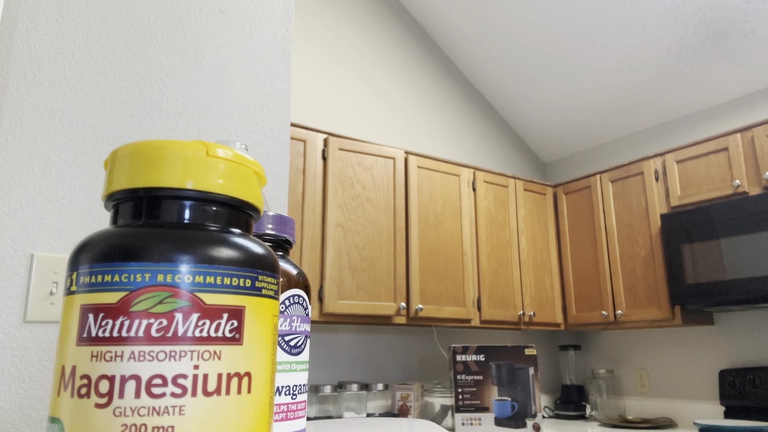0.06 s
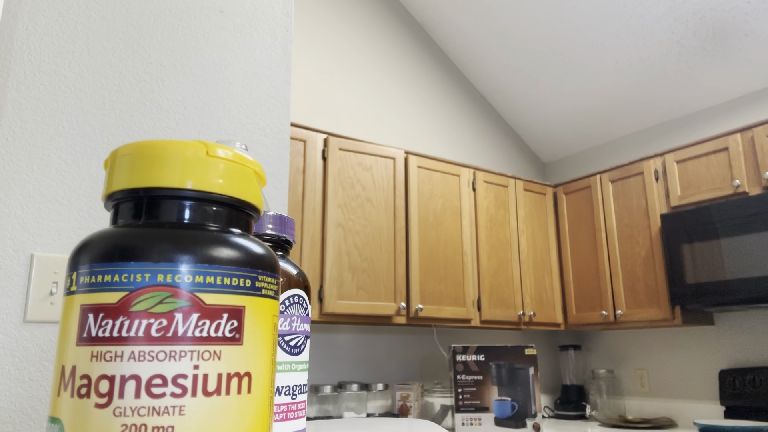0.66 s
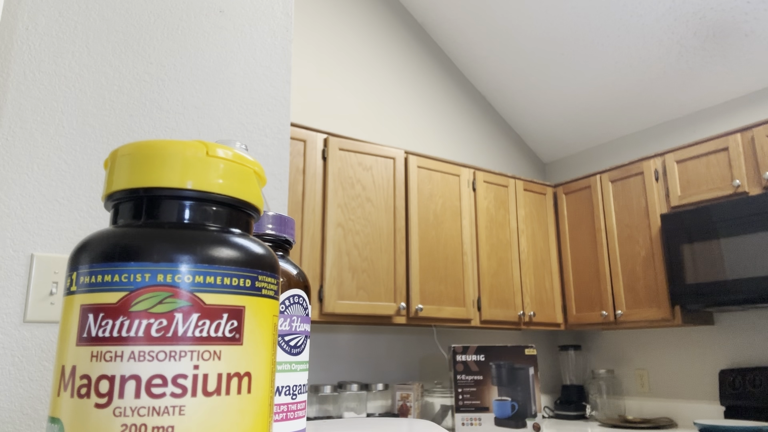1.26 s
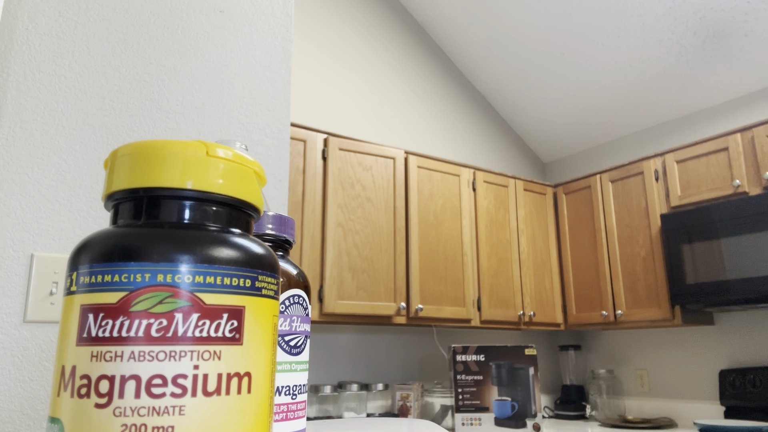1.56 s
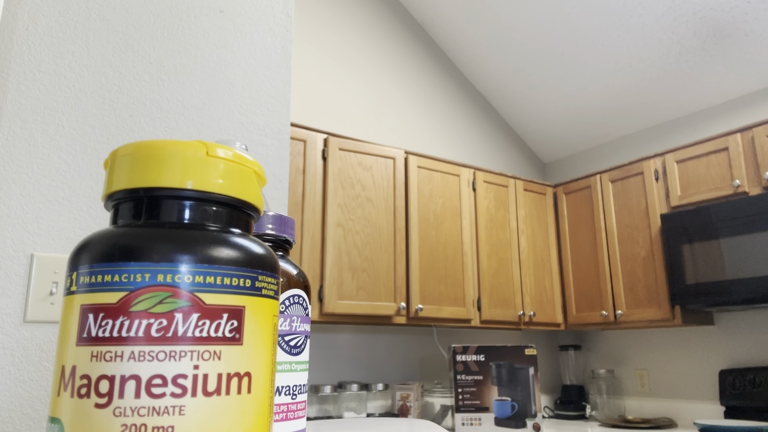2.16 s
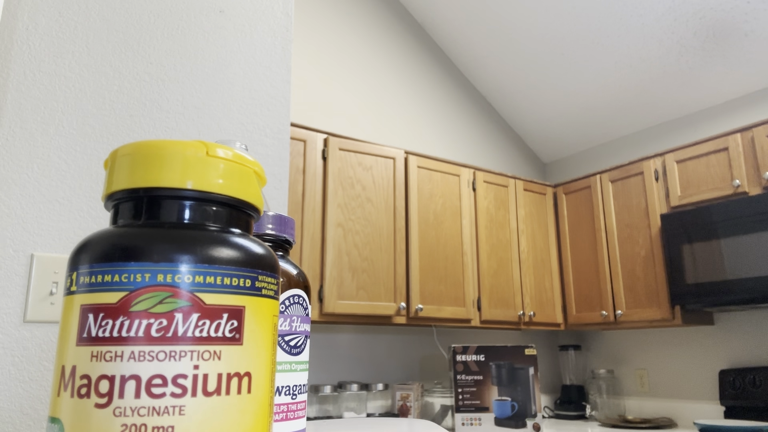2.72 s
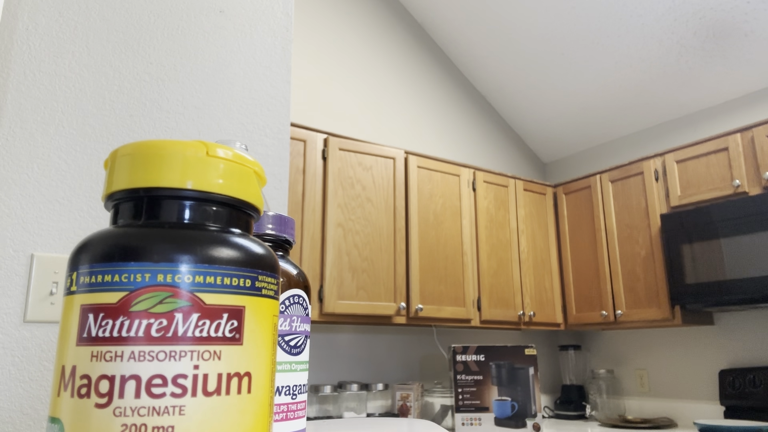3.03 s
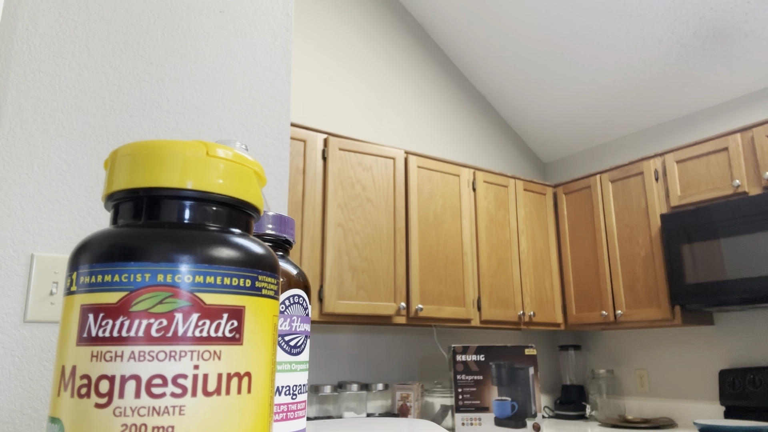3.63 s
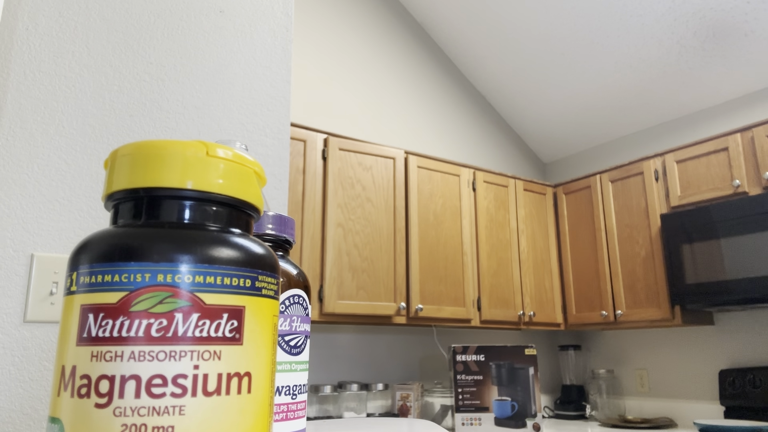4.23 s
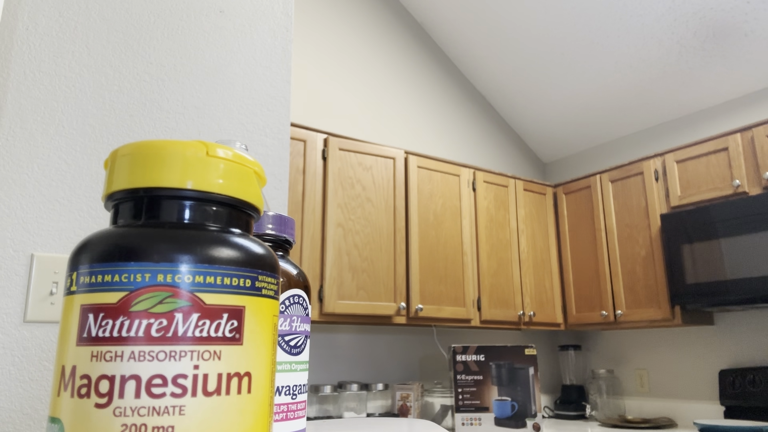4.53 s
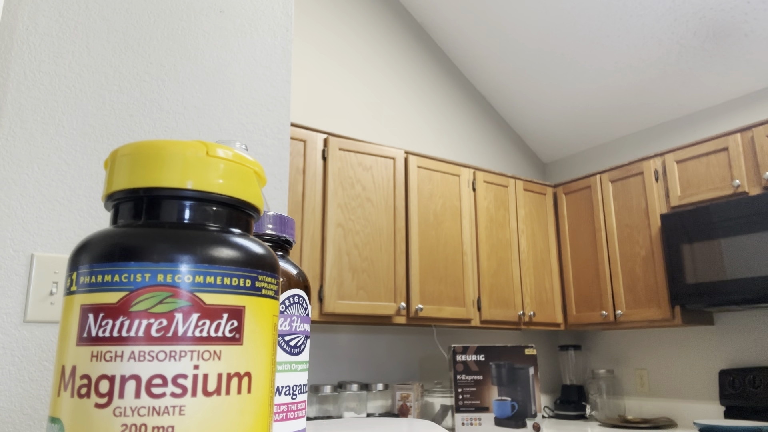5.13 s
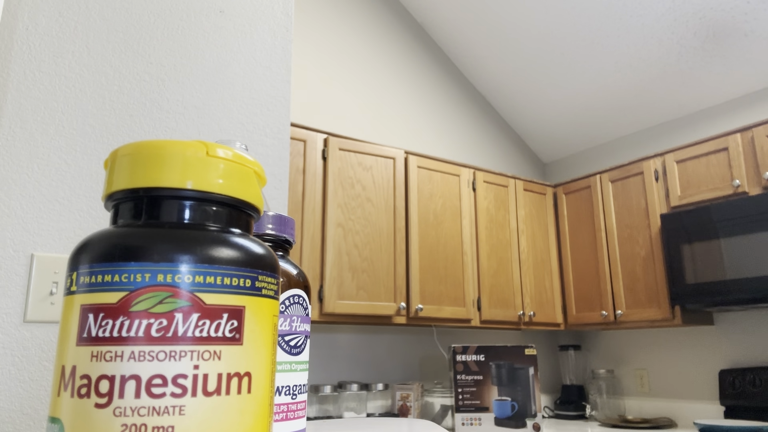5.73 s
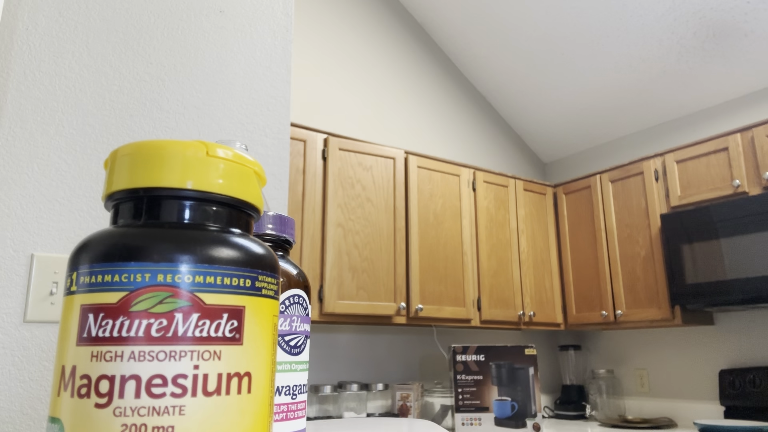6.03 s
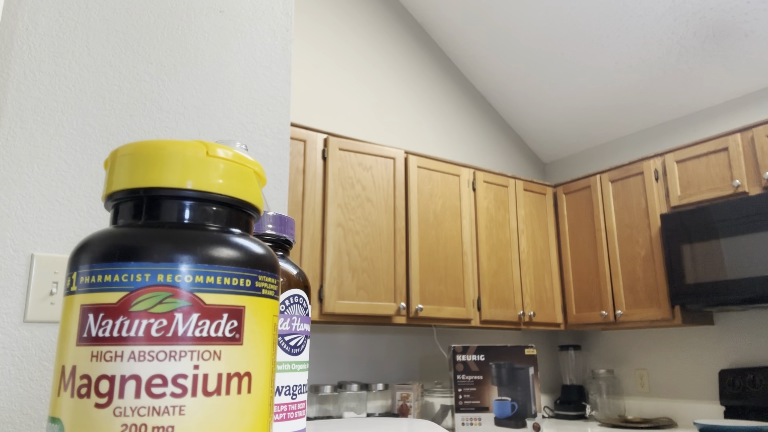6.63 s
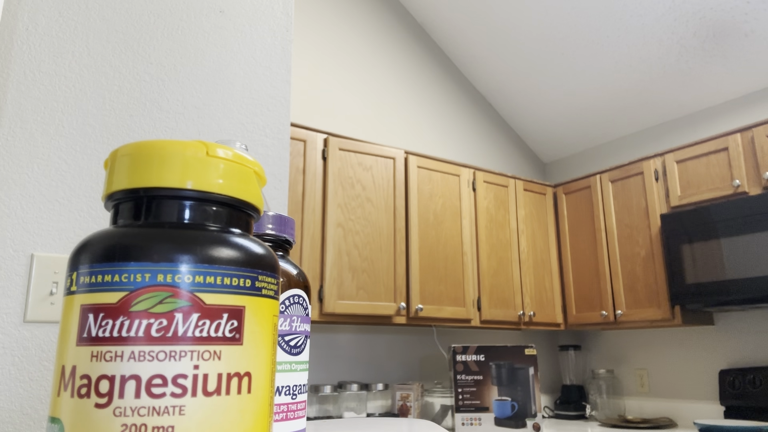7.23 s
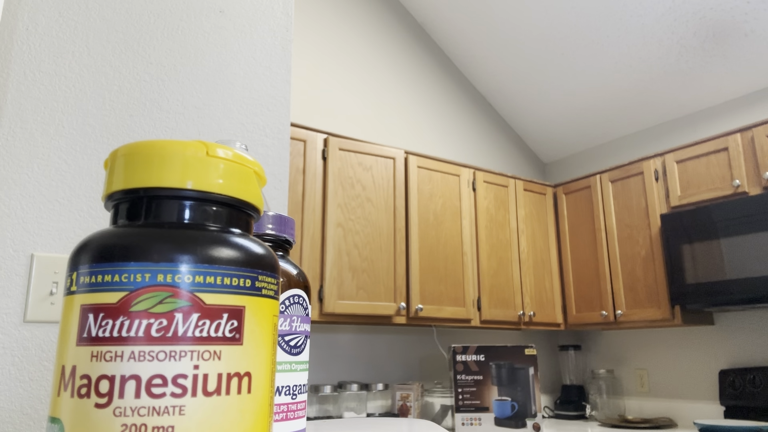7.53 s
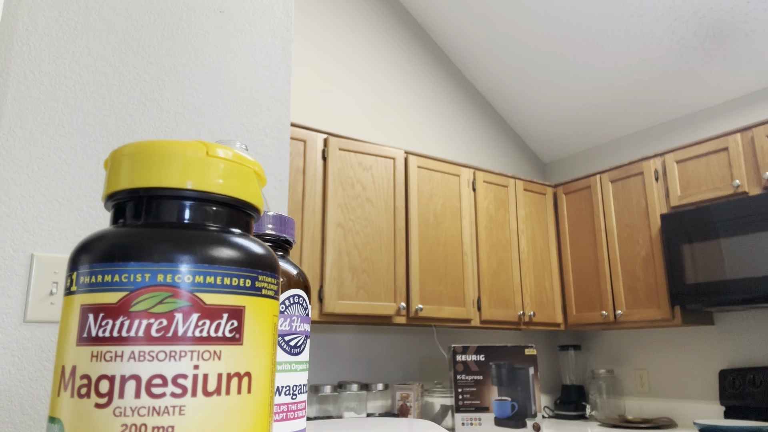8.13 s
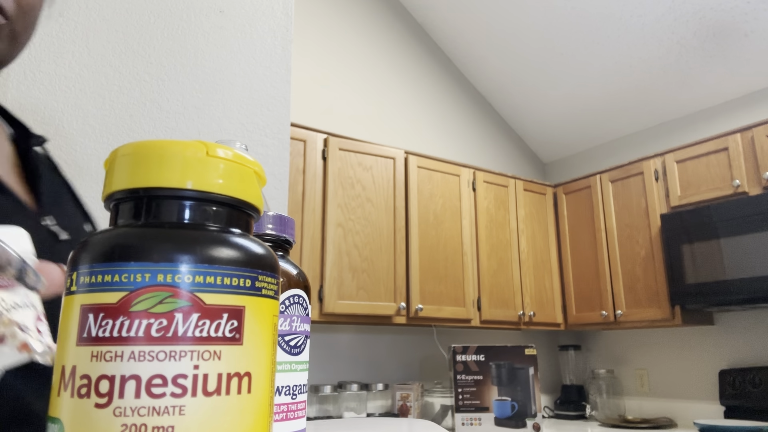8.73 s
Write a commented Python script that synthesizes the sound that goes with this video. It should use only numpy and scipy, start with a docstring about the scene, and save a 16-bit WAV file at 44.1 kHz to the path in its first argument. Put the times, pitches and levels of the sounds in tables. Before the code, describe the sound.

Close handling of plastic bottles: hollow knocks, ticking lids, a shower of pills and one heavy thud over a faint kitchen hum.

```python
"""Plastic supplement bottles are handled on a kitchen counter, close to a two-port microphone.
A faint appliance hum runs throughout. Sleeves swish and bottles slide; from 1 s lids tick, bottles
land rim first and knock hollowly as they settle, a few pills tumble and a fingertip skids.
Louder knocks follow near 4 s, then short rasps and, just after 5 s, a bright shower of pills.
At 7 s something heavy lands with a thud, and soft shuffling closes. The hard-walled kitchen rings on."""
import sys
import numpy as np
from scipy import signal
from scipy.fft import rfft, irfft, next_fast_len
from scipy.io import wavfile

SR = 44100
rng = np.random.default_rng(int(sys.argv[2]) if len(sys.argv) > 2 else 0)


def persist_wave(psi):
    """Save psi, clipped to +-1, as 16-bit WAV."""
    counts = np.round(np.clip(psi, -1, 1) * 32767).astype(np.int16)
    wavfile.write(sys.argv[1], SR, np.atleast_2d(counts).T)


N = 395577

# the kitchen's reverb tail: (frequency [Hz], t60 [s])
KITCHEN_DECAY = [(250, 0.82), (2000, 0.78), (6000, 0.78), (13000, 0.5)]
# appliance hum: (frequency [Hz], level [dB])
HUM_TONES = [(120, -57.5), (264, -70), (319, -69)]
# room tone: (frequency [Hz], level [dB])
RUSH_SPECTRUM = [(25, -27), (100, -12.5), (160, -24.5), (470, -24), (800, -31.5), (1500, -49), (4000, -56),
                 (11000, -61.5), (15500, -72)]

# bottles slid over the counter: (start [s], length [s], level [dB])
SLIDES = [(0.003, 0.4, -65), (1.342, 0.61, -51.5), (1.962, 0.49, -55), (4.672, 0.086, -36),
          (5.895, 0.17, -44), (6.27, 0.3, -53), (6.637, 0.32, -52), (6.97, 0.14, -40), (7.595, 0.43, -55),
          (8, 0.71, -55.5), (8.576, 0.65, -52.5)]
# the sleeve alone as the arm reaches: (start [s], length [s], level [dB])
REACHES = [(4.68, 1, -56), (5.995, 0.074, -49.5), (6.665, 0.23, -53.5), (8.03, 0.61, -66.5), (8.70, 1, -63)]
# plastic dragging on the counter: (frequency [Hz], level [dB])
SCRAPE_SPECTRUM = [(88, -39), (150, -8), (367, -8), (1010, -6), (5000, -33), (11000, -88.5)]
# sleeve cloth: (frequency [Hz], level [dB])
SWISH_SPECTRUM = [(1470, -19), (2500, -10.5), (4600, -10), (11800, -20.5), (15500, -38)]

# fingers and lids tapping a bottle: (time [s], level [dB], relative snap [dB], relative body [dB])
TAPS = [(1.026, -42, -9.5, 1.5), (1.350, -42.5, -9, 8), (1.425, -43, -5.5, -19), (1.639, -34, -15, -13),
        (1.921, -41.5, -9.5, 12), (2.441, -44.5, -28, 0), (2.482, -41, -18.5, 3), (2.597, -48, -33, 6),
        (2.665, -30.5, -12, -4.5), (3.035, -35.5, -15, 6.5), (3.294, -44.5, -11, -14),
        (3.443, -35.5, -10, -1.5), (3.548, -27, -19, -1.5), (4.521, -42, -5.5, 2.5),
        (4.666, -28.5, -13, 7.5), (4.97, -29.5, -38.5, -4.5), (5.114, -25, -37, -2.5),
        (5.166, -22.5, -3.5, -13), (5.275, -14.5, -5.5, 4.5), (5.457, -18.5, -10.5, -12),
        (5.745, -40, -4, -21), (6.289, -51.5, 3.5, -18), (7.029, -22.5, -26, -9), (7.077, -17.5, -8.5, -31),
        (7.401, -44.5, -1.5, -2), (7.490, -47, -1.5, 5), (7.757, -54, 4, -17), (7.796, -48, -35, -6),
        (7.887, -53.5, 2.5, -11)]
# the bright edge of a contact: (frequency [Hz], level [dB])
SNAP_SPECTRUM = [(1000, -50.5), (3000, -2.5), (5000, 1.5), (8000, -0.5), (12000, -8.5), (15000, -25.5)]
# a lid flexing: (frequency [Hz], level [dB])
CLACK_SPECTRUM = [(150, 3), (350, -2.5), (1150, 6.5), (2300, 0), (2800, -3.5), (3600, -8), (9000, -28.5)]
# a lid ringing: (frequency [Hz], level [dB], t60 [s])
LID_MODES = [(2091, -7, 0.049), (2345, 4, 0.012)]

# bottles set down: (time [s], rim level [dB], base level [dB], base pitch [Hz], springiness [0-1])
LANDINGS = [(1.072, -20, -20.5, 735, 0.87), (1.362, -42, -35, 694, 0.15), (1.505, -26, -24, 625, 0.37),
            (1.641, -35, -29, 625, 0.32), (3.838, -24.5, -17.5, 650, .4), (3.888, -22, -6, 620, 0.28),
            (3.920, -29, -6, 572, .2), (4.188, -28, -25, 490, .3), (4.428, -44, -31.5, 635, 0.28),
            (5.165, -13, -2, 478, .45), (5.392, -20.5, -10, 720, 0.4), (5.893, -32.5, -26, 503, 0.07),
            (6.290, -37, -30, 440, 0.3), (7.797, -38, -31, 425, 0.57)]
# a held bottle nudges its neighbours: (time [s], level [dB])
BUMPS = [(2.05, -33), (2.2, -40), (3.335, -42.5), (8.631, -34)]
# a hollow bottle ringing on the counter: (frequency [Hz], level [dB], t60 [s])
BOTTLE_MODES = [(310.1, -15, 0.3), (350.2, -2.5, 0.08), (429.7, -11, 0.082), (508, -2.5, 0.036),
                (584, 1.5, 0.057), (642.4, -2, 0.095), (706.5, -9.5, 0.17)]

# pills sliding and piling up: (time [s], level [dB], settling t60 [s])
TUMBLES = [(1.087, -39.5, 0.67), (5.161, -31.5, 1.15), (5.255, -19.5, 0.13), (5.272, -13, 0.1224),
           (5.303, -18.5, 0.04), (5.379, -16.5, 0.2338), (5.458, -20, 0.2662), (7.074, -26.5, 0.76)]
# their rattle: (frequency [Hz], level [dB])
PILL_SPECTRUM = [(120, -58), (200, -16.5), (345, -2), (554, -3), (680, 1.5), (2060, -13.5), (11400, -37.5),
                 (15500, -50.5)]
# the pill bottle's wall: (frequency [Hz], width [Hz], level [dB])
WALL_RESONANCES = [(4680, 290, 0), (8000, 940, -3.5), (11000, 1200, -10)]

# a fingertip on plastic: (start [s], length [s], pitch [Hz], width [Hz], level [dB])
SKIDS = [(1.235, 0.063, 5200, 130, -59), (8.636, 0.055, 10800, 2580, -60)]

# heavy blows and soft bumps through the counter: (time [s], level [dB], relative slap [dB])
THUDS = [(4.207, -45.5, 9), (5.19, -35.5, 8.5), (5.755, -28.5, -18.5), (6.992, -25.5, -10.5),
         (7.08, -24.5, -0.5), (7.090, -5.5, -12.5), (7.103, -9.5, -9.5), (7.168, -19, -11.5),
         (8.643, -31.5, -18.5)]
# the counter's boom: (frequency [Hz], level [dB], t60 [s])
COUNTER_MODES = [(55, -1, 0.17), (75.4, 4.5, 0.16), (153.5, -8, 0.25), (194, -10.5, 0.13),
                 (234.6, -9.5, 0.25), (331, -7.5, 0.21)]
# a blow's dull slap: (frequency [Hz], level [dB])
SLAP_SPECTRUM = [(59, -46.5), (120, -4.5), (595, -0.5), (1130, -12.5), (2300, -21.5), (15600, -75)]

# fingers and pills scraping the wall: (start [s], length [s], level [dB], tilt [dB/octave])
RASPS = [(4.688, 0.12, -56, 1), (4.794, 0.07, -50, 2), (4.876, 0.065, -55.5, 4.5), (4.971, 0.06, -52, -2.5),
         (5.167, 0.093, -35, -8), (6.68, 0.17, -55, -1), (7.713, 0.22, -63.5, -1.5)]

PORT_GAP_S, DIFFUSE_GAP_S = 0.0004985, 0.00092  # port spacing: for direct sound, for sound from all sides
TOP_HZ = 15600
RIM_HZ, RIM_TICK_DB, RIM_SNAP_DB = 385, -12, -10  # a rim's low knock; its tick; the snap in that tick
TIP_S, FLIGHT_S, BOUNCE_LOSS_DB = .014, .046, 1.0  # rim to base; a fully springy hop; growing hop loss
JOLTS_PER_S, JOLT_DB, JOLT_HZ = 7, 8, 402  # a sliding bottle catches and knocks; dB over the slide
DEEPEST_HZ, DB_PER_OCTAVE = 33.7, 25  # low cutoff of a 0 dB blow; this much softer lifts it an octave


def amp(db):
    """Decibels to gain."""
    return 10 ** (np.asarray(db) / 20)


def unit(x):
    """Scaled to rms 1."""
    return x / np.sqrt(np.mean(x ** 2) + 1e-20)


def along(points, hz):
    """A curve of (frequency [Hz], value) points, read on a log axis."""
    freqs, values = np.transpose(points)
    return np.interp(np.log(hz + 1), np.log(freqs + 1), values)


def filtered(x, response):
    """x through an EQ given as a function of frequency."""
    n = x.shape[-1]
    padded = next_fast_len(n + SR // 5)
    return irfft(rfft(x, padded) * response(np.fft.rfftfreq(padded, 1 / SR)), padded)[..., :n]


def coloured(x, spectrum):
    """x shaped by a spectrum, at rms 1."""
    return unit(filtered(x, lambda hz: amp(along(spectrum, hz))))


def add(track, s, sound):
    """Mix a sound in at s seconds."""
    part = track[round(s * SR):][:len(sound)]
    part += sound[:len(part)]


def fade(t, t60):
    """An exponential decay, 60 dB down at t60."""
    return np.exp(-np.log(1000) * t / t60)


def swell(length, skew):
    """A stroke swells gently and eases off; a skew below 1 brings the peak forward."""
    return np.sin(np.pi * np.linspace(0, 1, round(length * SR)) ** skew) ** 2


def effort(strokes, skew):
    """The envelope of a series of strokes."""
    out = np.zeros(N)
    for s, length, db in strokes:
        add(out, s, amp(db) * swell(length, skew))
    return out


def ring(modes, t, scatter_db, weight=1):
    """Damped modes, struck together at new strengths, with a joint amplitude of 1."""
    hz, db, t60 = np.transpose(modes)
    size = weight * amp(db + scatter_db * rng.standard_normal(len(hz)))
    partials = fade(t, t60[:, None]) * np.sin(2 * np.pi * hz[:, None] * t)
    return size / np.linalg.norm(size) @ partials


def grains(n, per_s, spread_db):
    """Tiny contacts at random moments and of random size, rms 1."""
    hit = rng.random(n) < per_s / SR
    return unit(hit * rng.choice([-1, 1], n) * amp(spread_db * np.clip(rng.standard_normal(n), -2, 2)))


def direct(x, left_db=2.0):
    """Sound from the left reaches the left port first."""
    pair = filtered(x, lambda hz: np.exp(1j * np.pi * hz * PORT_GAP_S * np.array([[1], [-1]])))
    return pair * amp([[left_db], [-left_db]])


def diffuse(pair):
    """Sound from all sides: the two ports agree only at long wavelengths."""
    turn = lambda hz: np.arccos(np.sinc(2 * hz * DIFFUSE_GAP_S)) / 2
    mid, side = filtered(pair, lambda hz: np.array([np.cos(turn(hz)), np.sin(turn(hz))]))
    return np.array([mid + side, mid - side])


def reflections(x, early_db, tail_db, early_t60=0.23):
    """Early reflections off nearby things, then the room's tail."""
    t = np.arange(SR) / SR
    hz, frames, noise = signal.stft(rng.standard_normal((2, SR)), SR, nperseg=256)
    decaying = noise * fade(frames, along(KITCHEN_DECAY, hz)[:, None])
    tail = signal.istft(decaying, SR, nperseg=256)[1][:, :SR]
    tail *= 1 - np.exp(-(t / 0.014) ** 2)
    early = rng.standard_normal((2, SR)) * fade(t, early_t60) * (1 - np.exp(-t / 0.00051))
    room = diffuse(amp(early_db) * unit(early) + amp(tail_db) * unit(tail)) / np.sqrt(SR)
    return signal.fftconvolve(x[None], room, axes=1)[:, :N]


def in_kitchen(x, early_db, tail_db, left_db=0.86):
    """A source heard directly and through the room."""
    return direct(x, left_db) + reflections(x, early_db, tail_db)


def appliance(rush_db=-59):
    """The bed: mains hum over the low rush of a running appliance."""
    t = np.arange(N) / SR
    hum = sum(amp(db) * np.sqrt(2) * np.sin(2 * np.pi * (hz * t + rng.random())) for hz, db in HUM_TONES)
    rush = amp(rush_db) * coloured(diffuse(rng.standard_normal((2, N))), RUSH_SPECTRUM)
    return (hum + rush) * amp([[-1.2], [1.2]])


def rubbing(scrape_db=-3, swish_db=-5.0, sleeve_db=-19):
    """Bottles scrape in small slips; the sleeve swishes in finer grains with each slide and reach."""
    press = effort(SLIDES, skew=0.41)
    brush = amp(sleeve_db) * press + effort(REACHES, skew=0.33)
    catching = unit(filtered(rng.standard_normal(N), lambda hz: hz < 35))  # skin catches and lets go
    scrape = coloured(grains(N, per_s=300, spread_db=4.5), SCRAPE_SPECTRUM) * press
    swish = coloured(grains(N, per_s=2500, spread_db=7), SWISH_SPECTRUM) * brush
    rub = (amp(scrape_db) * scrape + amp(swish_db) * swish) * amp(1.32 * catching)
    return in_kitchen(rub, early_db=-1.5, tail_db=1.0)


def sharp_contacts():
    """Every tap and landing rim ticks: (time [s], level [dB], snap [dB])."""
    rims = [(s, rim_db + RIM_TICK_DB, RIM_SNAP_DB) for s, rim_db, *_ in LANDINGS]
    return [tap[:3] for tap in TAPS] + rims


def lid_ticks(clack_db=18, snap_db=19, ring_db=3, burst_t60=0.06, uneven_db=4, spots=4):
    """A snap of contact, then the clack and brief ring of a lid; each grip colours it anew."""
    bursts, clicks, t = np.zeros(N), np.zeros((spots, N)), np.arange(SR // 8) / SR
    click = signal.unit_impulse(len(t), SR // 500)
    bands_hz = np.arange(0, TOP_HZ, 220)
    attack = 1 - np.exp(-t / .0015)
    for i, (s, db, bright_db) in enumerate(sharp_contacts()):
        grip_db = uneven_db * np.clip(rng.standard_normal(len(bands_hz)), -1.5, 1.5)
        flex = 1 / (1 + amp(2 * bright_db + 10))  # sharper taps ring less
        clack = lambda hz: flex * amp(along(CLACK_SPECTRUM, hz) + clack_db)
        snap = lambda hz: amp(along(SNAP_SPECTRUM, hz) + bright_db + snap_db)
        colour = lambda hz: amp(np.interp(hz, bands_hz, grip_db)) * (clack(hz) + snap(hz))
        tuning = np.exp(.03 * rng.standard_normal())
        lid = flex * amp(ring_db) * attack * ring(LID_MODES, t * tuning, scatter_db=3)
        burst = rng.standard_normal(len(t)) * fade(t, burst_t60) * attack
        # the ports hear a ragged burst; the room, fed from all sides of the bottle, a clean click
        add(bursts, s, amp(db) * (filtered(burst / np.linalg.norm(burst), colour) + lid))
        add(clicks[i % spots], s, amp(db) * (filtered(click, colour) + lid / 2))
    return direct(bursts) + sum(reflections(spot, early_db=2, tail_db=1.5) for spot in clicks)


def light_contacts(body_lag_s=0.00296):
    """Bumps, taps and random sliding jolts stir the hollow body: (time [s], level [dB], pitch [Hz])."""
    for s, db in BUMPS:
        yield s, db, JOLT_HZ
    for s, db, _, body_db in TAPS:
        yield s + body_lag_s, db + body_db, RIM_HZ * 2 ** (0.34 * rng.random())
    for s, length, db in SLIDES:
        for when, pitch in rng.random((round(JOLTS_PER_S * length), 2)):
            yield s + when * length, db + JOLT_DB, JOLT_HZ * 2 ** (pitch - .5)


def landing_contacts(base_hits=3):
    """Rim first, then the base, in ever shorter, weaker hops: (time [s], level [dB], pitch [Hz])."""
    for s, rim_db, base_db, hz, spring in LANDINGS:
        yield s, rim_db, RIM_HZ
        s += TIP_S
        for hop in range(base_hits):
            yield s, base_db + 20 * np.log10(spring ** hop) - BOUNCE_LOSS_DB * hop ** 2, hz
            s += FLIGHT_S * spring ** (hop + 1)


def bottle_knocks(width_octaves=0.32, gain_db=5, detune=0.029, scuff_db=-19, rise_s=.0016):
    """Each contact rings the hollow modes near its pitch, shifted by the grip, and scuffs the counter."""
    out, t = np.zeros(N), np.arange(SR // 4) / SR
    drag = fade(t, t60=0.07) * (1 - np.exp(-t / .01))
    attack = 1 - np.exp(-(t / rise_s) ** 2)  # the soft base takes a moment to load
    for s, db, pitch_hz in [*landing_contacts(), *light_contacts()]:
        octaves_off = np.log2(np.array(BOTTLE_MODES)[:, 0] / pitch_hz)
        near = 1 / (1 + (octaves_off / width_octaves) ** 2)
        tuning = np.exp(detune * rng.standard_normal())
        body = ring(BOTTLE_MODES, t * tuning, scatter_db=3, weight=near)
        scuff = coloured(rng.standard_normal(len(t)), SCRAPE_SPECTRUM) * drag
        add(out, s, amp(db + gain_db) * (body + amp(scuff_db) * scuff) * attack)
    out = filtered(out, lambda hz: (1j * hz / (200 + 1j * hz)) ** 2)  # small bottles radiate little bass
    return in_kitchen(out, early_db=-9, tail_db=-7)


def wall(hz):
    """The resonances of the pill bottle's thin wall."""
    return sum(amp(db) * 1j * hz * width / (centre ** 2 - hz ** 2 + 1j * hz * width)
               for centre, width, db in WALL_RESONANCES)


def pill_tumbles(ring_db=-1):
    """Showers of pills strike the bottle wall and die away as the pile settles."""
    t = np.arange(N) / SR
    power = sum(amp(2 * db) * (t > s) * fade(np.abs(t - s), settle / 2) for s, db, settle in TUMBLES)
    hits = grains(N, per_s=420, spread_db=4) * np.sqrt(power)
    ringing = filtered(hits, lambda hz: 1 + amp(ring_db) * wall(hz))
    rattle = coloured(ringing, PILL_SPECTRUM) * np.sqrt(power.mean())
    return in_kitchen(rattle, early_db=1.5, tail_db=-3.5)


def finger_skids():
    """Skin sticks and slips on plastic, in a thin unsteady whistle or a quick bright zip."""
    out = np.zeros(N)
    for s, length, pitch_hz, width_hz, db in SKIDS:
        band = lambda hz: np.exp(-((hz - pitch_hz) / width_hz) ** 2)
        out += unit(filtered(rng.standard_normal(N), band)) * effort([(s, length, db)], skew=0.76)
    return in_kitchen(out, early_db=-0.5, tail_db=-22)


def counter_thuds(slap_t60=0.13):
    """A blow sets the counter booming close by, deeper the harder it is; its slap fills the room."""
    booms, slaps, t = np.zeros(N), np.zeros(N), np.arange(SR // 2) / SR
    for s, db, slap_db in THUDS:
        lowest_hz = DEEPEST_HZ * 2 ** (-db / DB_PER_OCTAVE)
        stirred = 1 / (1 + (lowest_hz / np.array(COUNTER_MODES)[:, 0]) ** 4)
        boom = ring(COUNTER_MODES, t, scatter_db=-3.5, weight=stirred)
        low_cut = lambda hz: 1 / np.sqrt(1 + (lowest_hz / 2 / (hz + 1)) ** 4)
        add(booms, s, amp(db) * filtered(boom, low_cut))
        slap = coloured(rng.standard_normal(len(t)), SLAP_SPECTRUM) * fade(t, slap_t60)
        add(slaps, s, amp(db + slap_db) * slap)
    close = in_kitchen(booms, early_db=-12, tail_db=-17, left_db=-.8)
    return close + in_kitchen(slaps, early_db=3.5, tail_db=1.5, left_db=1.5)


def wall_rasps():
    """Each short scrape is a run of tiny slips that set the bottle wall ringing."""
    out = np.zeros(N)
    knee_hz = WALL_RESONANCES[0][0] / 2
    for s, length, db, tilt_db in RASPS:
        slips = grains(round(length * SR), per_s=900, spread_db=5)
        colour = lambda hz: wall(hz) * amp(tilt_db * np.log2(np.maximum(hz, knee_hz)))
        add(out, s, amp(db) * unit(filtered(slips, colour)) * swell(length, skew=0.4))
    return in_kitchen(out, early_db=-5.5, tail_db=-0.5)


def scene():
    """Everything on the counter, over the kitchen's hum."""
    return (appliance() + rubbing() + lid_ticks() + bottle_knocks() + pill_tumbles()
            + finger_skids() + counter_thuds() + wall_rasps())


def record(dry):
    """The input stage rounds the tallest peaks; the extreme top and the lowest rumble are cut."""
    rounded = dry / (1 + (dry / .8) ** 4) ** .25
    return filtered(rounded, lambda hz: (hz < TOP_HZ) * (1j * hz / (25 + 1j * hz)) ** 2)


dry = scene()
out = record(dry)
persist_wave(out)
```